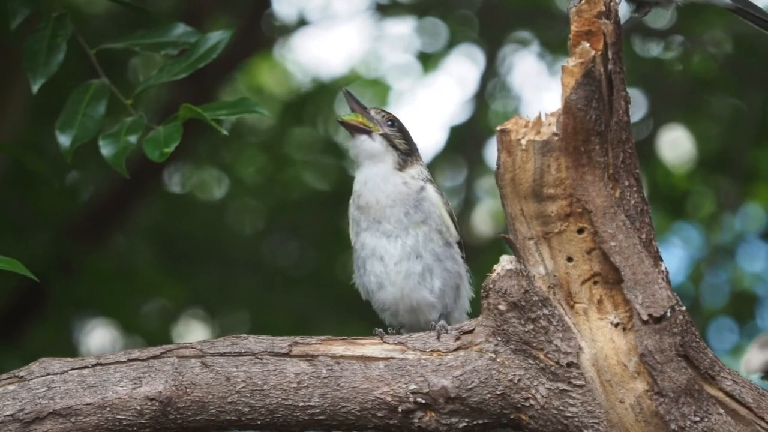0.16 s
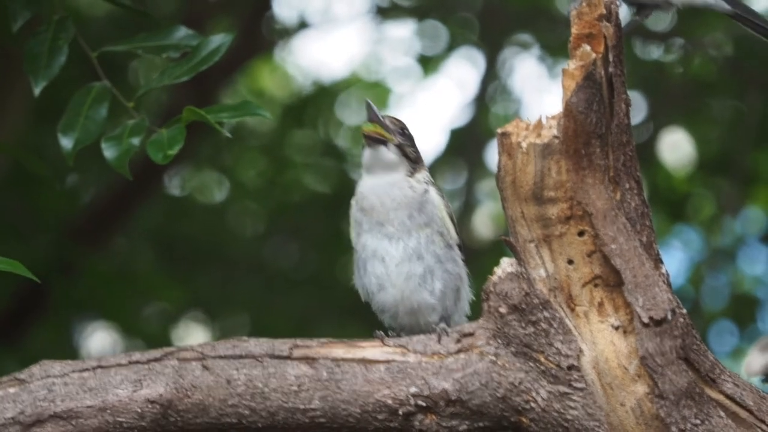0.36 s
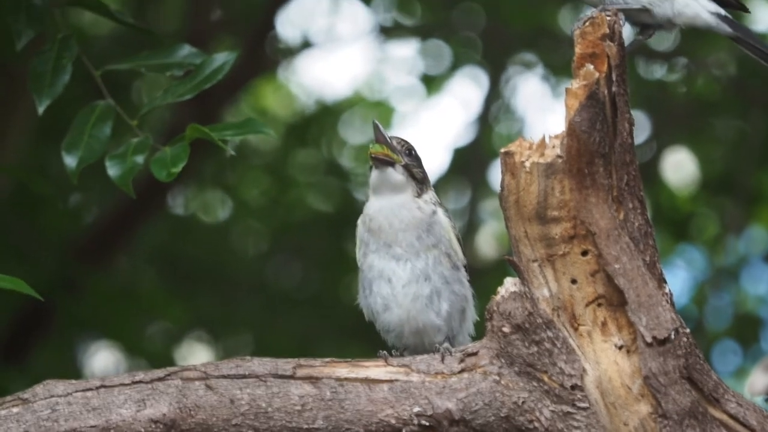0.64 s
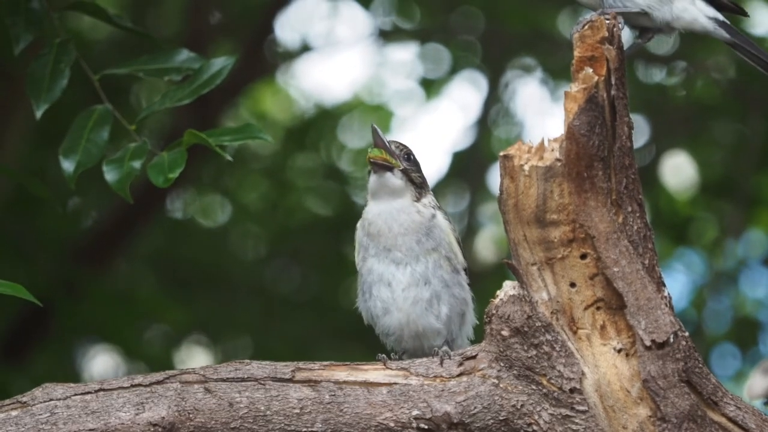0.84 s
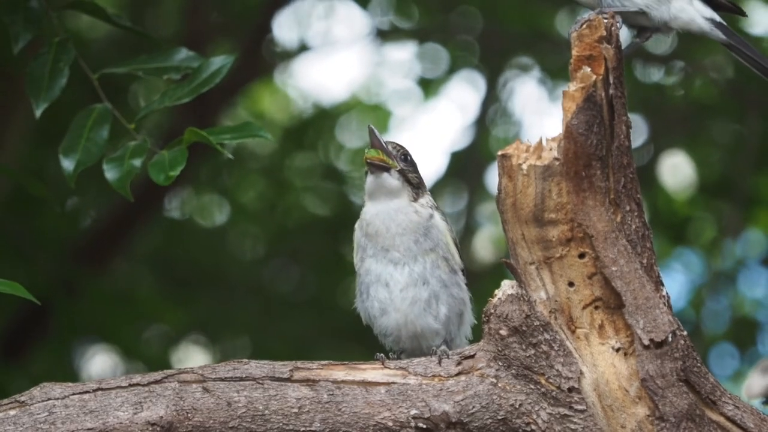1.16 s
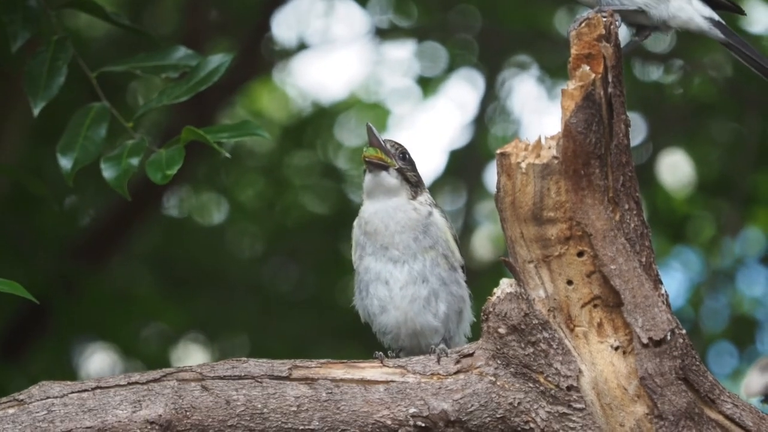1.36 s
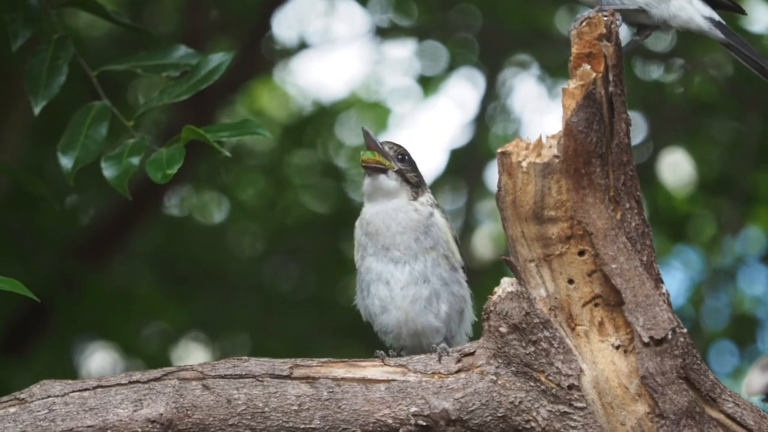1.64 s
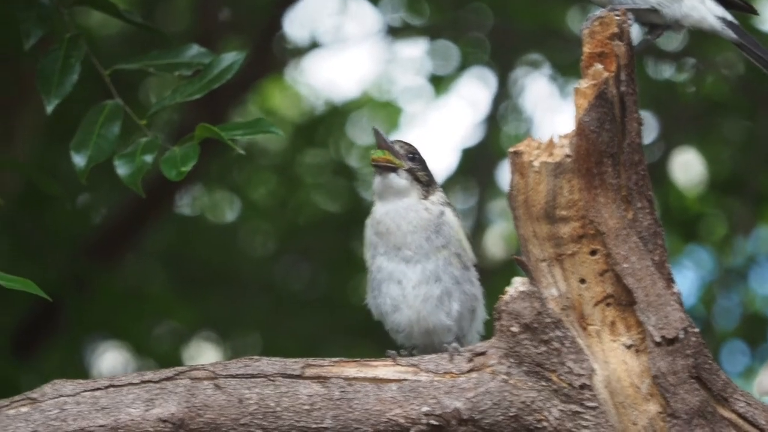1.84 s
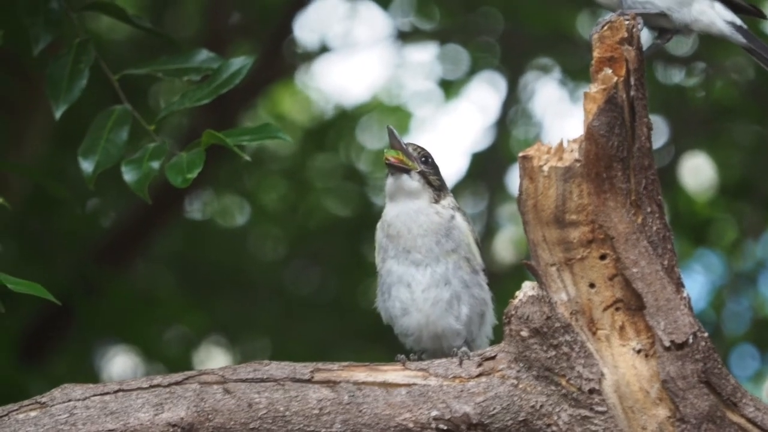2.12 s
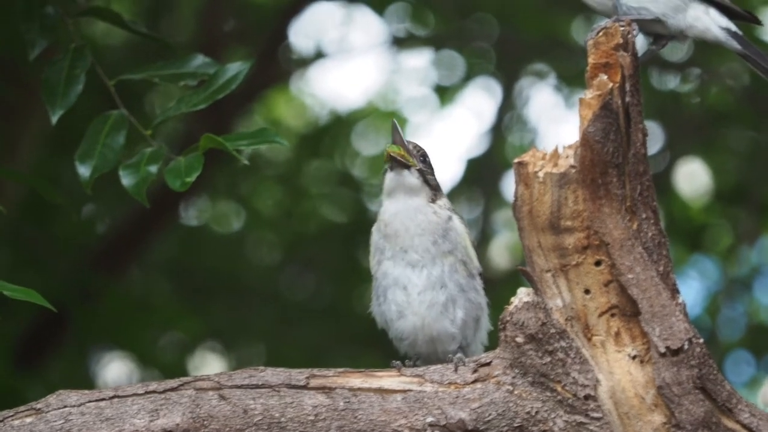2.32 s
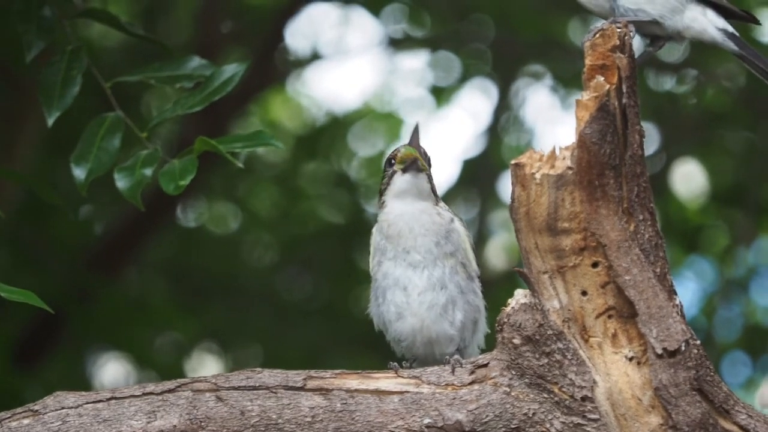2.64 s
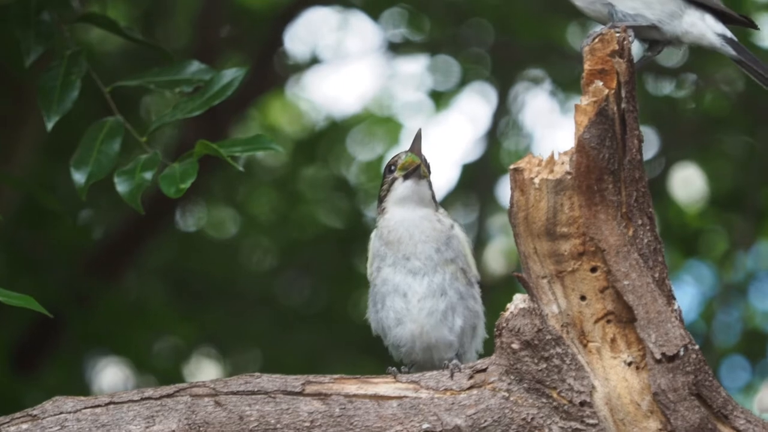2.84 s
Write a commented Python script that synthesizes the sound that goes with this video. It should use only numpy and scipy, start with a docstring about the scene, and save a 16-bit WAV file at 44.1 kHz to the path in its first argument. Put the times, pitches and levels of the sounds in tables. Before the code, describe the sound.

Nasal begging squawks from a fledgling on a branch repeat through to the end, lightly echoed by trees, while regular wing-flick rustles, a few dull knocks and low rumble sit beneath; outdoor microphone some metres away.

```python
"""From the start a low rumble and outdoor hiss (level-shaped noise bands) last throughout; a faint wavering hum
(noise-modulated tone) is heard early on, fades out, and returns more strongly near the end.
A young bird begs from a branch among trees: nasal squawks (gliding harmonics under throat resonances) sweep
upward, with fainter ones from farther off, all echoed by the trees. Dry rustles like wing flicks (grainy noise
bursts) soon come about six times a second, then a few soft knocks (decaying modes) join the calls."""
import sys
import numpy as np
from scipy import signal
from scipy.io import wavfile

SR = 44100
rng = np.random.default_rng(int(sys.argv[2]) if len(sys.argv) > 2 else 0)


def store_wav(level_fs):
    """Save 16-bit WAV to argv[1]."""
    pcm = np.round(np.clip(np.atleast_2d(level_fs), -1, 1) * 32767)
    wavfile.write(sys.argv[1], SR, pcm.T.astype(np.int16))


N = 131418  # length [samples]


def from_db(db):
    """Logarithmic level: 20 dB is a tenfold amplitude."""
    return 10 ** (np.asarray(db) / 20)


def rms_one(x):
    """Power normalization: the root mean square becomes 1."""
    return x / np.sqrt(np.mean(x ** 2) + 1e-20)


def clock():
    """Uniform sampling: the time of each sample [s]."""
    return np.arange(N) / SR


def in_time(rows):
    """Linear interpolation of (time [s], value) points."""
    return np.interp(clock(), *np.transpose(rows))


def at_hz(points, hz):
    """Interpolation of (frequency [Hz], value) points on a logarithmic frequency axis."""
    points_hz, values = np.array(points).T
    return np.interp(np.log(hz), np.log(points_hz), values)


def pan(db):
    """Interaural level difference: gains of left and right, positive towards the left."""
    return from_db(np.array([[db], [-db]]) / 2)


def drift(rate_hz):
    """Low-pass filtered noise: two equal poles leave a smooth random wander of rms 1."""
    pole = np.exp(-2 * np.pi * rate_hz / SR)
    wander = signal.lfilter([1], [1, -2 * pole, pole * pole], rng.standard_normal(N + SR))
    return rms_one(wander[SR:])  # skip the filter's run-in


# likeness of the two ears' noise: (frequency [Hz], correlation [-1 to 1])
EAR_LIKENESS = [(50, 1), (170, 0.82), (350, 0.74), (700, 0.66), (1300, 0.72), (2600, 0.15), (4500, -0.019),
                (14000, 0.01)]


def banded_noise(spectrum, low_hz, high_hz, patchy_db, count):
    """Subband synthesis: noise bands with their own level, flicker and interaural correlation; rms 1."""
    out = 0
    edges = np.geomspace(max(low_hz, 10), min(high_hz, SR / 2 - 10), count + 1)
    white = rng.standard_normal((2, 2, N + SR // 2))  # neighbouring bands use different noise
    for k, (low, high) in enumerate(zip(edges, edges[1:])):
        band = signal.butter(2, [low, high], "band", fs=SR, output="sos")
        mid, side = signal.sosfilt(band, white[k % 2])[:, -N:]
        hz = np.sqrt(low * high)
        alike = np.clip(at_hz(EAR_LIKENESS, hz), -1, 1)
        gain = from_db(at_hz(spectrum, hz) + patchy_db * drift(9.6))
        out = out + gain * (np.sqrt(1 + alike) * mid + np.sqrt(1 - alike) * side * [[1], [-1]])
    return rms_one(out)


# spectral shapes of rumble and hiss: (frequency [Hz], relative density [dB per Hz])
RUMBLE_SPECTRUM = [(20, -1), (28, -4.5), (38, -2.5), (47, 3.5), (60, -13), (80, -19.5), (110, -28),
                   (200, -34)]
AIR_SPECTRUM = [(59, -31), (100, -3), (196, -6.5), (362, -3.5), (497, -11.5), (589, -2.5), (843, -19),
                (998, -10), (1210, -13), (1840, -23), (2470, -17.5), (3250, -17.5), (4460, -25.5),
                (7250, -23), (8410, -27.5), (10200, -22.5), (11300, -34), (13400, -26.5), (15500, -28.5)]
# their levels before panning: (time [s], level [dB])
RUMBLE_LEVEL = [(0, -51), (.5, -48.5), (.85, -45.5), (1.2, -47), (1.55, -45.5), (2.0, -44), (2.45, -48.5),
                (2.98, -49)]
AIR_LEVEL = [(0, -54.5), (.45, -58), (.7, -58), (1.5, -60), (2.1, -60.5), (2.4, -56), (2.98, -58.5)]
SWAY_DB, SWAY_HZ = -44.5, 13.8  # slow pressure swings: level before panning, upper cutoff
RUMBLE_PAN_DB, AIR_PAN_DB = 1.9, .5


def background():
    """Spectral shaping of noise: slow swings of air, a low rumble and the hiss of the outdoors."""
    low_pass = signal.butter(4, SWAY_HZ, fs=SR, output="sos")
    sway = signal.sosfilt(low_pass, rng.standard_normal(N + SR))[SR:]
    sway = from_db(SWAY_DB) * rms_one(sway)
    rumble = from_db(in_time(RUMBLE_LEVEL)) * banded_noise(RUMBLE_SPECTRUM, 18.3, 225, patchy_db=3.8, count=10)
    air = from_db(in_time(AIR_LEVEL)) * banded_noise(AIR_SPECTRUM, 100, 16490, patchy_db=2.55, count=40)
    return pan(RUMBLE_PAN_DB) * (rumble + sway) + pan(AIR_PAN_DB) * air


# strength of the hum: (time [s], level [dB])
HUM_LEVEL = [(0, -70.5), (.5, -64.5), (.8, -145), (2.1, -83), (2.3, -60), (2.65, -60.5), (2.88, -58.5),
             (2.98, -78)]
HUM_HZ, HUM_WIDTH_HZ = 363.5, 50  # centre, rate of the wander


def hum():
    """Quadrature modulation: two slow noises turn one pitch into a narrow, wavering, far-off band."""
    phase = 2 * np.pi * HUM_HZ * clock()
    tone = drift(HUM_WIDTH_HZ) * np.cos(phase) + drift(HUM_WIDTH_HZ) * np.sin(phase)
    return from_db(in_time(HUM_LEVEL)) * tone


# calls from farther off, the near bird's calls, and the second, lower tone into which its voice splits:
# (start [s], length [s], first pitch [Hz], top of the pitch arch [Hz], time to that top [s],
#  mid-call level before the throat [dB], swell [dB per s], brightness [dB per octave], roughness [0 to 1])
FAR_SQUAWKS = [(-.03, 0.18, 993, 1058, 0.19, -73.5, -9, -3, 0.98),
               (.128, 0.075, 960, 1063, .12, -62, 0, 4, 0.3),
               (1.555, 0.212, 1076, 1267, .2, -63, -47, 1.5, 0.44),
               (2.315, 0.073, 975, 1090, 0.146, -62, -2, -8, .25),
               (2.545, 0.22, 1125, 1289, .15, -60, -22, -1, 0.17)]
NEAR_SQUAWKS = [(.196, 0.1425, 1025, 1224, 0.12, -52.5, -40, 0.5, 0.33),
                (.665, 0.23, 1055, 1313, .16, -52, -6, -0.5, 0.45),
                (1.25, 0.23, 1034, 1397, 0.21, -50.5, 10, -1.1, 0.15),
                (1.795, 0.22, 1065, 1273, 0.25, -52, 10, -1, 0.16),
                (2.365, .16, 1032, 1290, .235, -52, 37, -0.5, 0.3),
                (2.835, 0.32, 1071, 1330, 0.16, -52.5, -2, -1, 0.26)]
SPLIT_TONES = [(.78, .11, 1118, 1215, .15, -56.5, -15, -5, .25)]
# harmonics 1, 2, 3 ...: (level [dB], left-right difference [dB], left ear's delay [s])
HARMONICS = [(0, -0.1, 0.000026), (0, 1, 0.00007), (0, -4, .000115), (0, -2, 0.00011), (0, -1.5, .00007),
             (0, 9.5, .00007)]
# resonances of the throat: (frequency [Hz], gain [dB])
THROAT = [(900, 8.5), (1150, -0.5), (1420, -10), (2150, -15.5), (2480, -3), (2800, -9), (3200, -7.5),
          (3650, -6), (4200, -13), (4700, -19.5), (5400, -10), (6200, -33), (8500, -24)]
ATTACK_S, RELEASE_S = 0.027, 0.032
JITTER, RASP = .03, .8  # pitch and amplitude wander as fractions, at roughness 1
FLUTTER_DB = 1.9  # rms level wander of each harmonic


def squawks(rows):
    """Source-filter principle: fluttering harmonics of an arched pitch slide through the throat's resonances."""
    out = np.zeros((2, N))
    waver = drift(185)
    flutter = [from_db(FLUTTER_DB * drift(35)) for _ in HARMONICS]
    rasp = [drift(200) for _ in HARMONICS]
    for start, length, first_hz, top_hz, rise, db, swell, brightness_db, rough in rows:
        on = (clock() > start) & (clock() < start + length)
        t = clock()[on] - start
        arch_hz = top_hz - (top_hz - first_hz) * (1 - t / rise) ** 2
        hz = arch_hz * (1 + JITTER * rough * waver[on])
        hz = np.maximum(hz, first_hz / 2)
        cycles = np.cumsum(hz) / SR
        ear_cycles = lambda delay: np.array([cycles - delay * hz, cycles])
        envelope = from_db(db + swell * (t - length / 2))
        envelope = envelope * np.clip(t / ATTACK_S, 0, 1) * np.clip((length - t) / RELEASE_S, 0, 1)
        for i, (level_db, pan_db, delay) in enumerate(HARMONICS):
            k = i + 1
            gain = from_db(level_db + at_hz(THROAT, k * hz) + brightness_db * np.log2(k))
            gain = gain * flutter[i][on] * (1 + RASP * rough * rasp[i][on])
            wave = np.sqrt(2) * np.sin(2 * np.pi * k * ear_cycles(delay))  # rms 1
            out[:, on] += envelope * gain * pan(pan_db) * wave
    return out


TREES_T60_S = 0.26  # time for the echoes to decay by 60 dB
ECHO_LOW_CUT_HZ = 1040


def trees(x):
    """Convolution with sparse scattering: decaying echoes of trunks and leaves, thin in the lows, per side."""
    t = np.arange(SR // 2) / SR
    echoes = rng.standard_normal((2, len(t))) * (rng.random((2, len(t))) < 900 / SR)  # about 900 per s
    echoes = echoes * from_db(-60 * t / TREES_T60_S) * (t > .005)
    echoes /= np.sqrt(np.sum(echoes ** 2, axis=1, keepdims=True))
    low_cut = signal.butter(2, ECHO_LOW_CUT_HZ, "high", fs=SR, output="sos")
    return signal.fftconvolve(x, signal.sosfilt(low_cut, echoes), axes=1)[:, :N]


# rustles, levels before panning:
# (time of the peak [s], treble level [dB], body level [dB], rise constant [s], fall constant [s])
RUSTLES = [(.074, -54, -77, 0.0096, 0.018), (.105, -61.5, -65, 0.014, 0.045),
           (0.421, -61, -53.5, 0.014, 0.012), (.485, -67, -84, 0.013, 0.013),
           (0.578, -63.5, -58, 0.011, 0.028), (0.738, -62.5, -60, .015, 0.013),
           (.912, -62.5, -55, 0.005, 0.037), (1.079, -62, -58.5, 0.0089, 0.018),
           (1.239, -61.5, -54.5, 0.024, 0.029), (1.395, -58.5, -57, 0.036, 0.04),
           (1.554, -55, -52, .026, 0.034), (1.702, -57, -54.5, .015, 0.031),
           (1.856, -58, -48.5, 0.016, .03), (2.012, -56, -50, 0.023, 0.041),
           (2.188, -56.5, -51, .022, 0.031), (2.358, -61, -49, 0.02, 0.017),
           (2.511, -56, -51.5, 0.025, 0.027), (2.663, -55, -46, 0.013, .022),
           (2.824, -67, -49, 0.0074, 0.022)]
# spectral shapes of the two parts: (frequency [Hz], relative density [dB per Hz])
RUSTLE_TREBLE = [(2000, -25), (3500, -1), (5000, 1.5), (7500, 3.5), (8500, -0.5), (10200, 4), (11200, -8),
                 (13500, 5.5), (15500, -11.5)]
RUSTLE_BODY = [(150, 3.5), (300, 3.5), (600, -4.5), (850, -6.5), (1100, 1.5), (1900, -10), (2250, -7.5),
               (2600, 1), (3200, -4), (4500, -17.5), (8000, -46)]
RUSTLE_GRAIN_DB, GRAINS_HZ = 1, 244  # rms depth and rate of the grain
TICKS_PER_S, TICK_DB = 240, -16  # crisp grains inside the treble: mean density, depth
RUSTLE_PAN_DB = 1.4


def rustles():
    """Amplitude modulation of noise: a bright, ticking hiss over a duller body swells and fades."""
    treble, body = 0, 0
    for s, treble_db, body_db, rise, fall in RUSTLES:
        t = clock() - s
        shape = np.exp(-np.abs(np.where(t < 0, t / rise, t / fall)))
        treble = treble + from_db(treble_db) * shape
        body = body + from_db(body_db) * shape
    grain = rms_one(from_db(RUSTLE_GRAIN_DB * drift(GRAINS_HZ)))
    impulses = (rng.random(N) < TICKS_PER_S / SR) + 1e-18
    ticks = rms_one(signal.lfilter([1], [1, -np.exp(-1 / (0.0024 * SR))], impulses))  # 2.4 ms decay
    hiss = banded_noise(RUSTLE_TREBLE, 2000, 14700, patchy_db=2.57, count=16)
    hiss = hiss * rms_one(1 + from_db(TICK_DB) * ticks)
    brush = banded_noise(RUSTLE_BODY, 149.6, 5860, patchy_db=3.0, count=28)
    return pan(RUSTLE_PAN_DB) * grain * (treble * hiss + body * brush)


# soft knocks: (time [s], level before mode weighting [dB], centre of the modes excited [Hz],
#  spread [octaves], time constant of the onset [s])
KNOCKS = [(.222, -34.5, 170, .4, 0.011), (0.331, -34, 290, 0.21, 0.023), (.44, -29.5, 690, 0.16, 0.026),
          (.455, -35.5, 278, 0.44, 0.016), (.572, -55, 890, 0.59, 0.0011), (0.731, -52, 270, 1.0, 0.0048),
          (1.301, -44.5, 283, 0.38, 0.0016), (1.534, -39.5, 1010, 0.16, 0.0023),
          (1.843, -44, 555, 1.2, 0.0039), (1.984, -42.5, 260, 1.9, 0.00035), (2.006, -55, 505, 0.67, .002)]
# modes that ring: (frequency [Hz], relative level [dB], decay by 60 dB [s])
KNOCK_MODES = [(98.5, 9.5, 0.033), (180, 5, 0.043), (277, 2.5, 0.047), (352, 6, 0.017), (533, -28, 0.092),
               (711, -9, 0.089), (987, -2, 0.042), (2200, 14, 0.0091)]


def knocks():
    """Modal superposition: soft contacts set short decaying modes ringing, each favouring its own register."""
    out = np.zeros(N)
    t = np.arange(SR // 5) / SR
    for s, db, centre_hz, octaves, softness in KNOCKS:
        ring = 0
        for k, (hz, level_db, t60) in enumerate(KNOCK_MODES):
            weight = np.exp(-.5 * (np.log2(hz / centre_hz) / octaves) ** 2)
            decay = from_db(db + level_db - 60 * t / t60)
            ring = ring + (-1) ** k * weight * decay * np.sin(2 * np.pi * hz * t)  # alternating polarity
        i = int(s * SR)
        out[i:i + len(t)] += (ring * (1 - np.exp(-t / softness)))[:N - i]
    return out


FAR_WET_DB, NEAR_WET_DB, RUSTLE_WET_DB = -5, -2.5, -12.5  # gains into the echoes


def scene():
    """Linear superposition: background, hum, calls, rustles, their echoes and knocks add."""
    far, near = squawks(FAR_SQUAWKS), squawks(NEAR_SQUAWKS + SPLIT_TONES)
    rustle = rustles()
    echoes = trees(from_db(FAR_WET_DB) * far + from_db(NEAR_WET_DB) * near + from_db(RUSTLE_WET_DB) * rustle)
    return background() + hum() + far + near + echoes + rustle + knocks()


CUTOFF_HZ = 15750


def record(dry):
    """Low-pass filtering: an elliptic filter cuts the top steeply."""
    return signal.sosfilt(signal.ellip(12, .1, 70, CUTOFF_HZ, fs=SR, output="sos"), dry)


dry = scene()
out = record(dry)
store_wav(out)
```